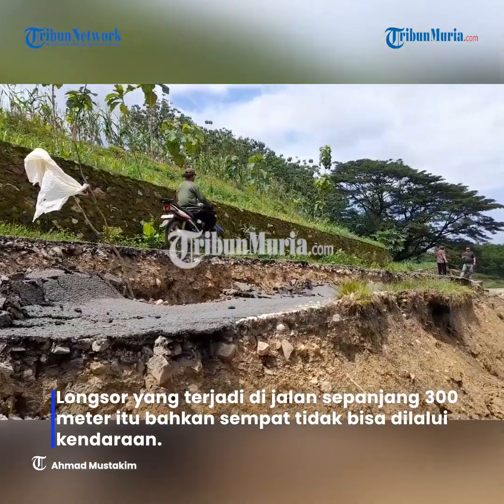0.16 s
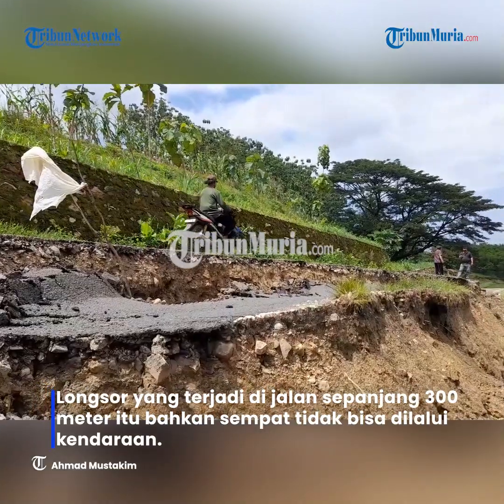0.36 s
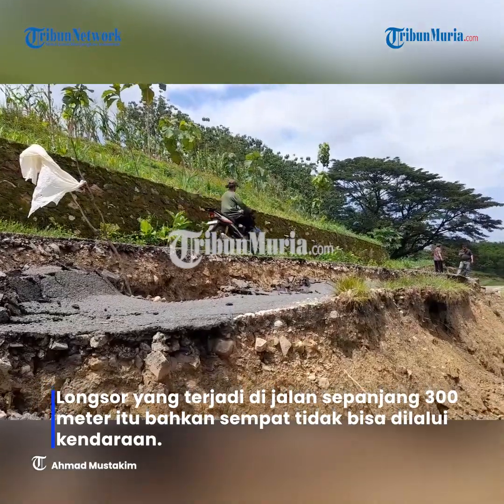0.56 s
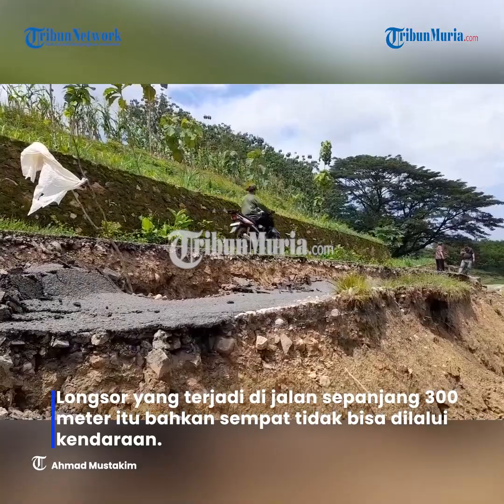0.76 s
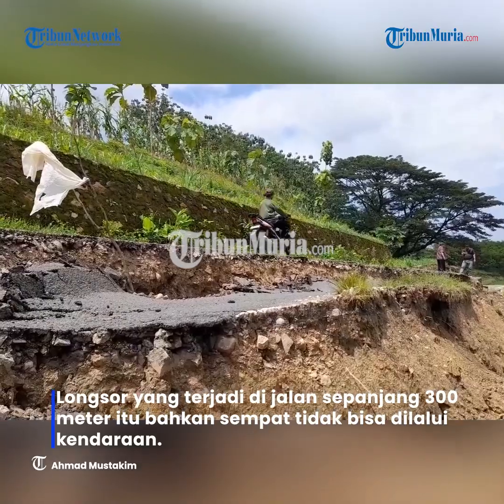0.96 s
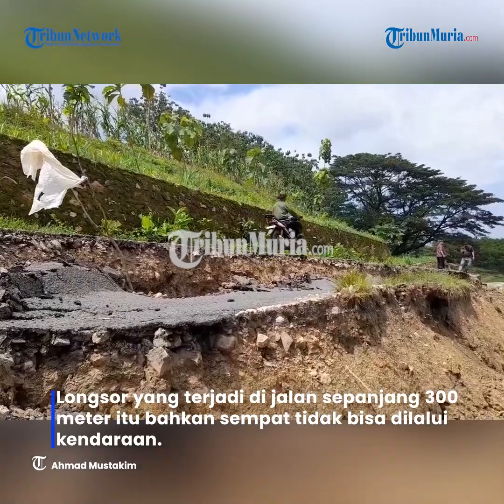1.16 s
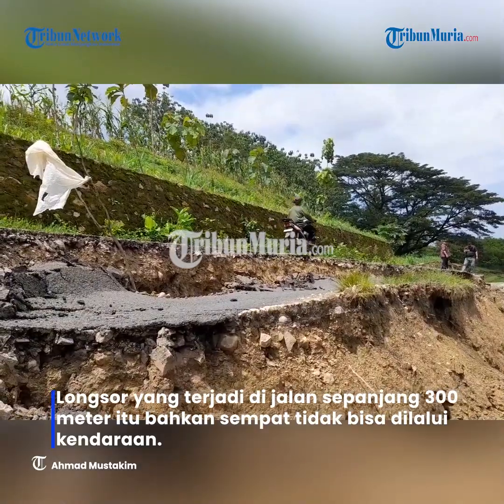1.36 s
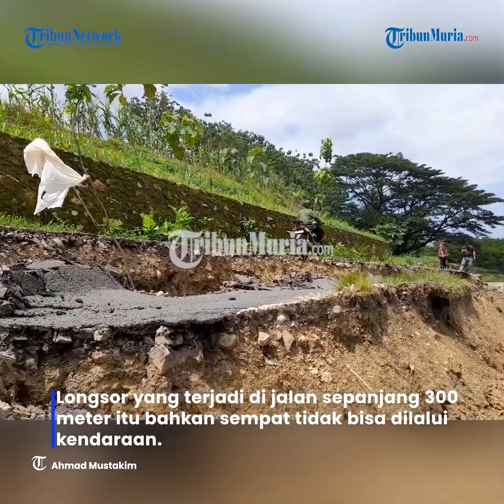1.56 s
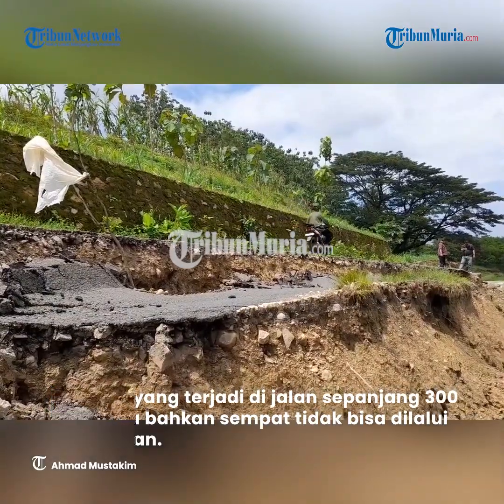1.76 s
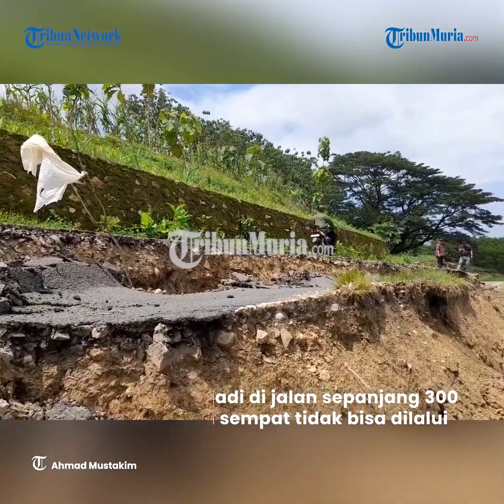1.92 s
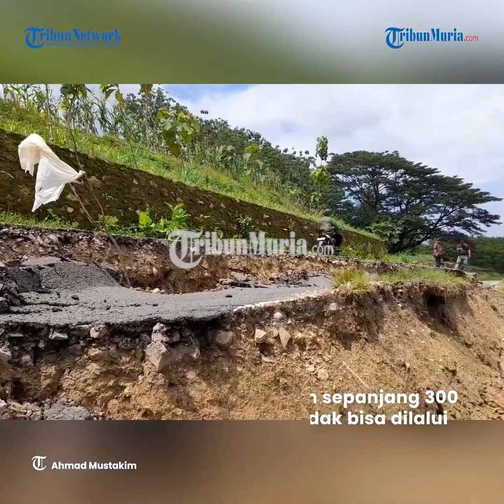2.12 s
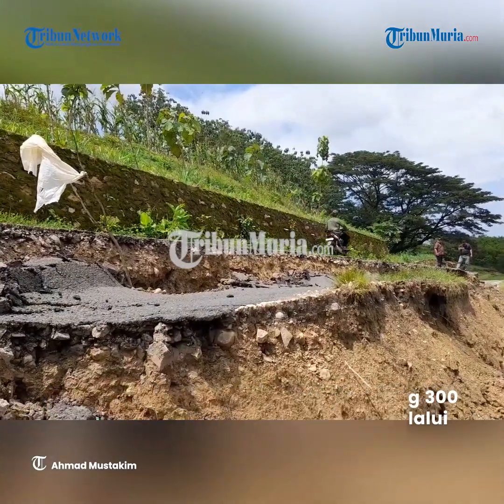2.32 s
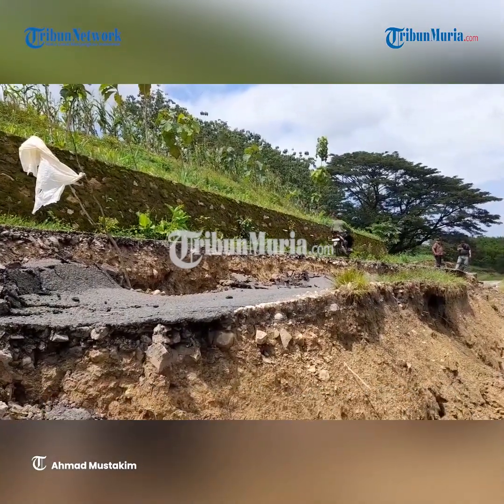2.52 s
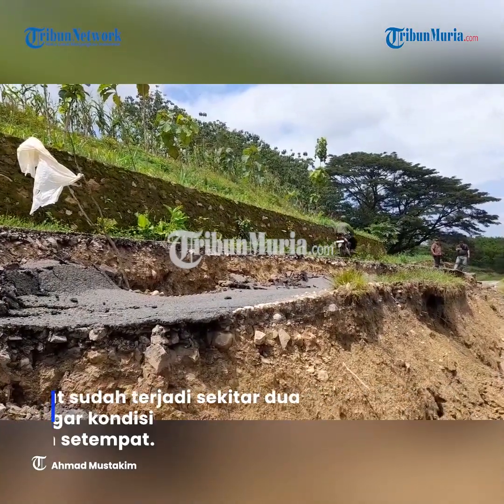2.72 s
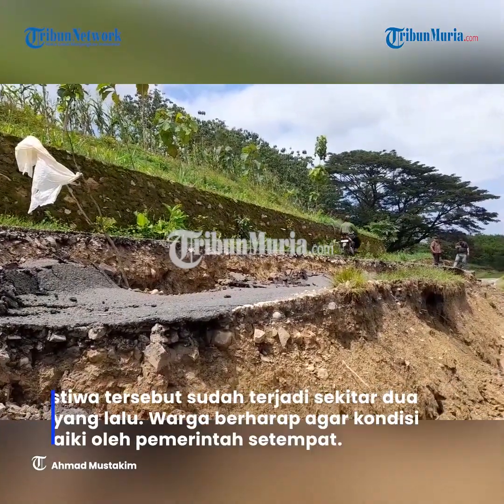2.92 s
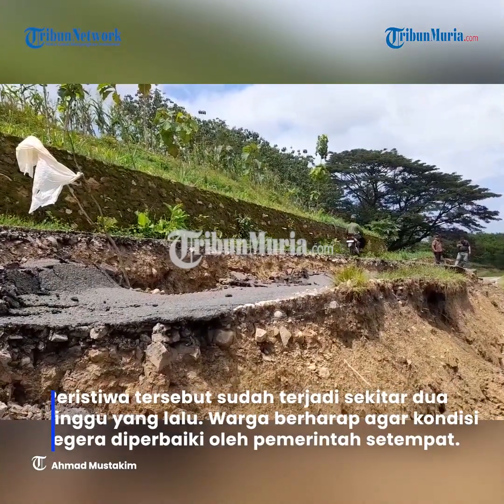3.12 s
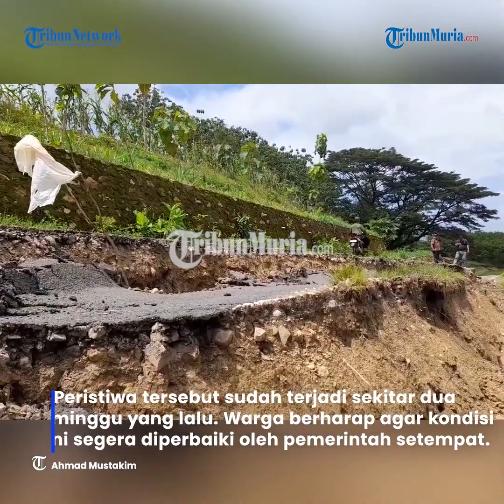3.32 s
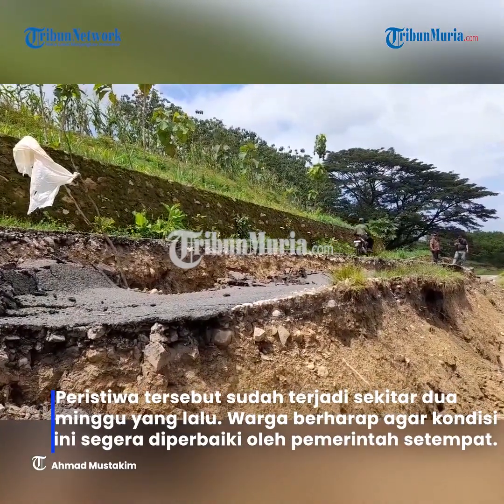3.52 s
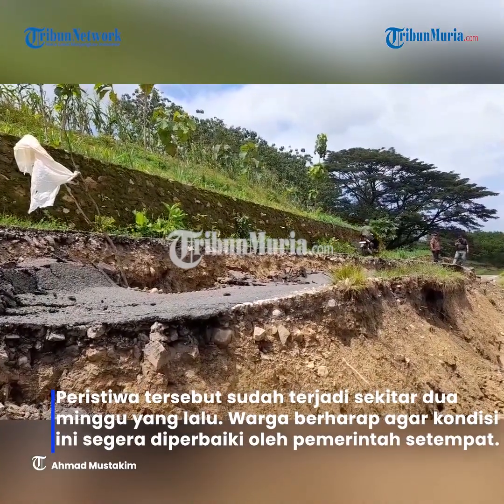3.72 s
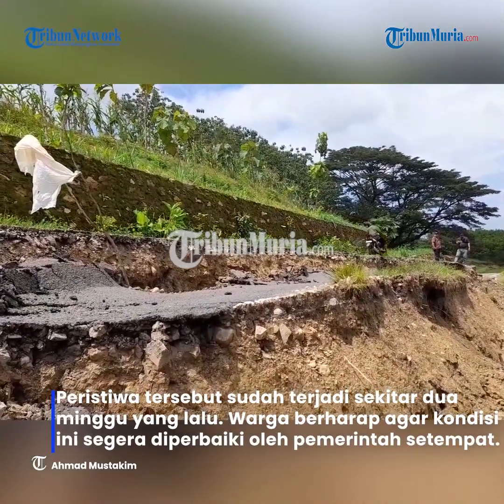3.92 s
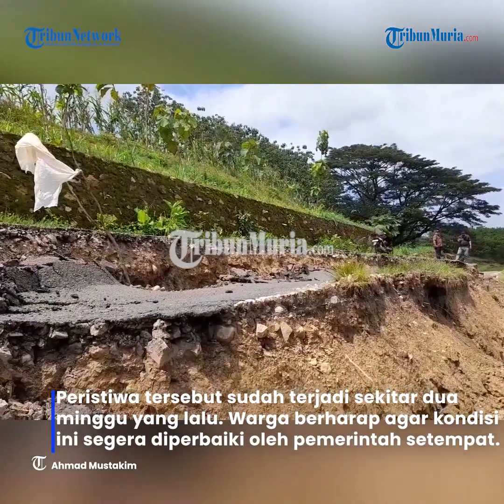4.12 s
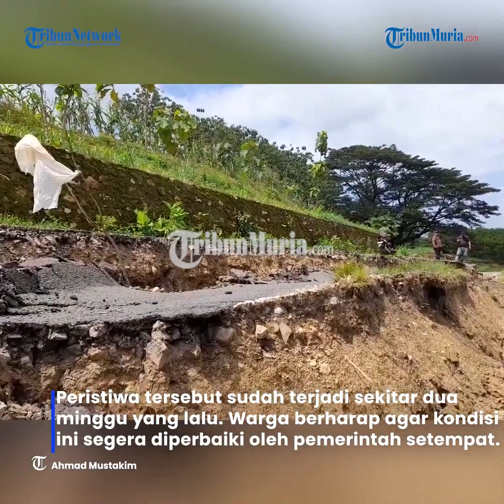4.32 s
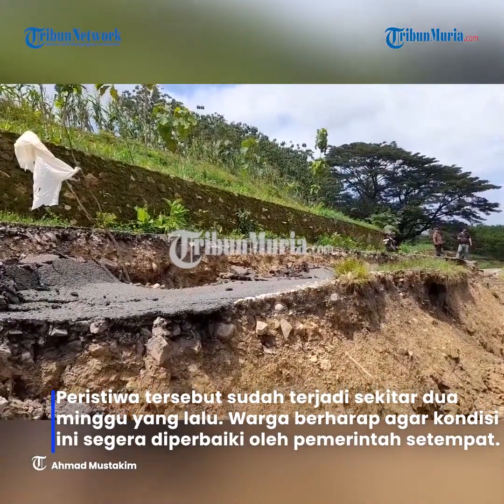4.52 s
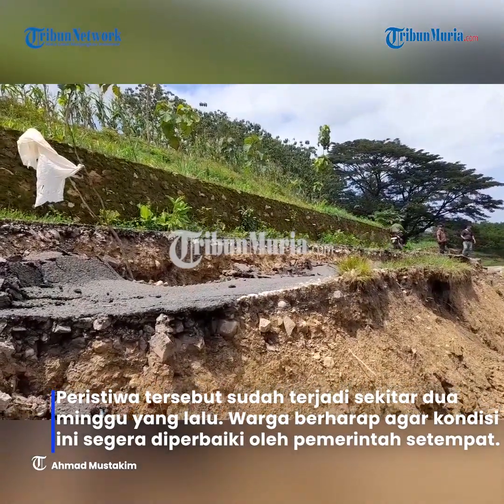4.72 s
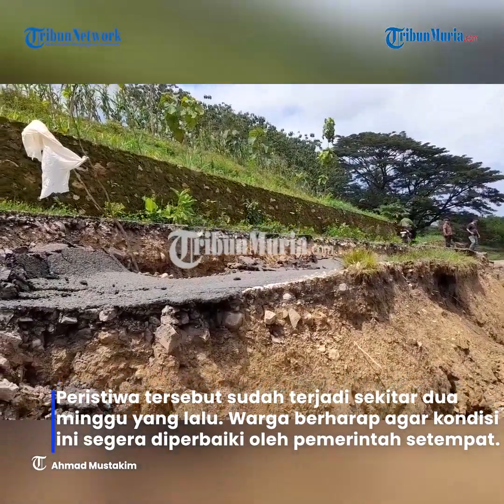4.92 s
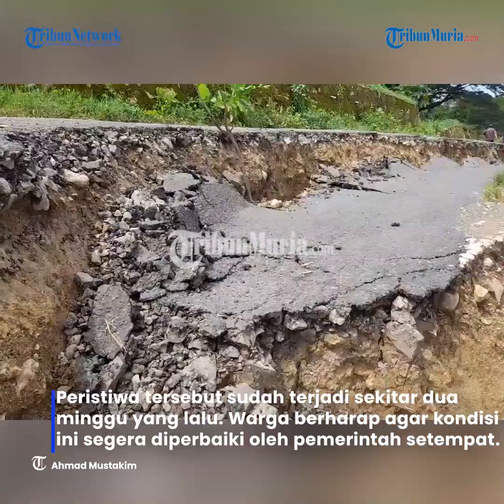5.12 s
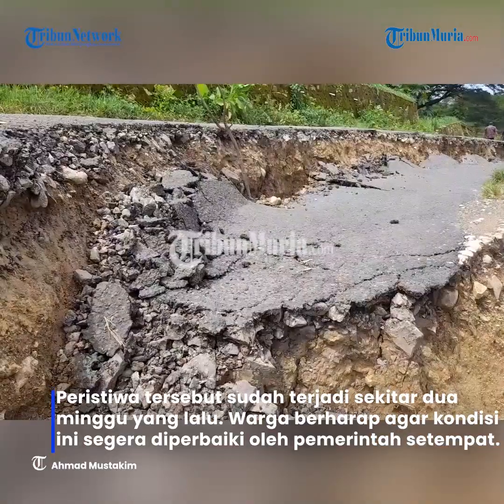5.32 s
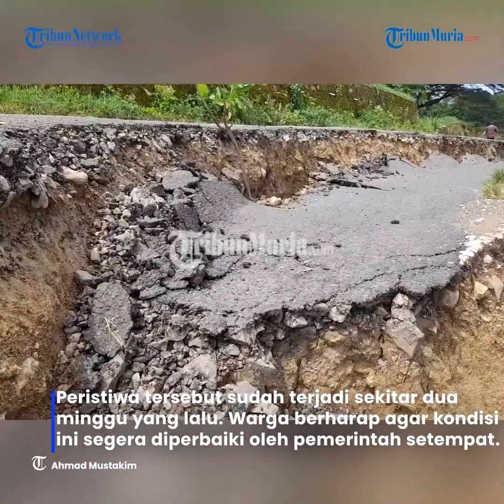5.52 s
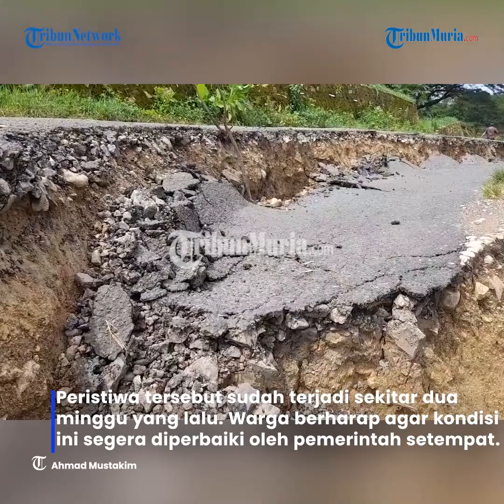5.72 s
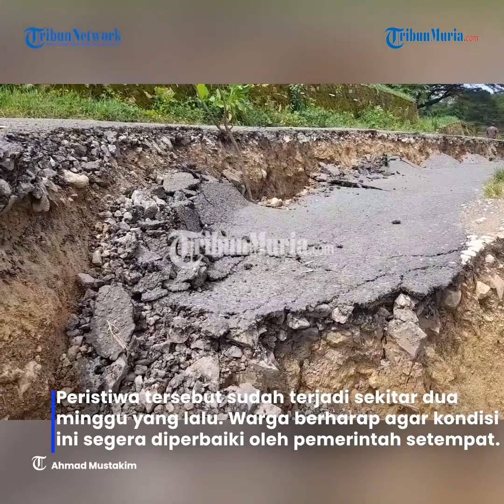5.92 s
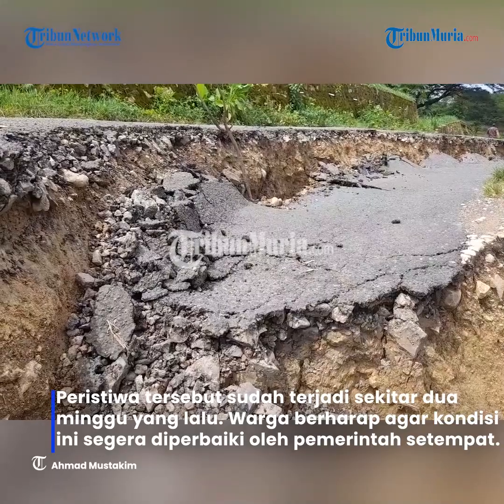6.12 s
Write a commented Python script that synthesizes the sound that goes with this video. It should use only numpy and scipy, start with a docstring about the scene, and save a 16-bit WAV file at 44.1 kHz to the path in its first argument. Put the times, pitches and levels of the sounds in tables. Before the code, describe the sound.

Stereo microphone on an open country verge, bike slightly right of centre. Deep, slow single-cylinder putting begins near, with gravel crunch, tiny metallic grit ticks and hollow frame knocks. A big rattling jolt comes at one second, duller bumps near two, then the bike recedes. Short high bird chirps surface over faint chugging; after five seconds air and engine are abruptly much quieter.

```python
"""Small motorcycle leaving over a gravelly road

From the verge in open country: a single-cylinder bike idles slowly away, each firing ringing its silencer modes.
Filtered noise makes the tyre rumble, crunch and air; decaying sines make the knocks and ticks of grit.
Birds are gliding sines with echoes. At five seconds the microphone stands farther off: engine and air drop.
"""
import sys
import numpy as np
from scipy import signal
from scipy.fft import rfft, irfft, next_fast_len
from scipy.io import wavfile
from scipy.ndimage import uniform_filter1d

SR = 44100
rng = np.random.default_rng(int(sys.argv[2]) if len(sys.argv) > 2 else 0)


def to_wav(sig):
    """Store sig (one row per channel, or 1-D mono) as 16-bit WAV at the path in sys.argv[1].

    Samples outside -1..1 are clipped; the rate is SR.
    """
    pcm = np.clip(np.atleast_2d(sig), -1, 1) * 32767
    pcm = np.round(pcm).astype(np.int16)
    wavfile.write(sys.argv[1], SR, pcm.T)  # frames by channels


N = 272351  # length (samples)


def amp(db):
    """Gain of a level in dB."""
    return 10 ** (np.asarray(db) / 20)


def unit(x):
    """x at rms 1."""
    return x / np.sqrt(np.mean(x ** 2) + 1e-20)


def along(points, hz):
    """Values at hz between (f/Hz, value) points on a log frequency axis."""
    f, v = np.transpose(points)
    return np.interp(np.log(hz + 1), np.log(f + 1), v)


def curves(rows):
    """One value per sample for each column after the time."""
    s, *cols = np.transpose(rows)
    return [np.interp(np.arange(N) / SR, s, c) for c in cols]


def filtered(x, response):
    """x times a response of frequency."""
    m = next_fast_len(N + SR // 2)
    gain = response(np.fft.rfftfreq(m, 1 / SR))
    return irfft(rfft(x, m) * gain, m)[..., :N]


def place(times, sounds):
    """Each sound laid down at its time."""
    out = np.zeros(N + SR)
    for s, sound in zip(times, sounds):
        out[round(s * SR):][:len(sound)] += sound
    return out[:N]


# Likeness of the noise at the left and right microphone ports: f/Hz, likeness 0-1
ALIKE = [(60, 0.05), (180, 0.68), (550, 0.93), (1650, 0.57), (4970, 0.14), (15000, 0.054)]


def rush(spectrum, patchy_db, grit):
    """Stereo noise of rms 1 in patches of time and pitch; grit makes some samples stand out like stones."""
    white = rng.standard_normal((2, N)) * np.exp(grit * rng.standard_normal(N))
    z = signal.stft(white, nperseg=512)[2]
    field = rng.standard_normal(z.shape[1:])
    field = uniform_filter1d(field, size=6, axis=0)  # across frequency
    field = uniform_filter1d(field, size=4, axis=1)  # across time
    pair = signal.istft(z * amp(patchy_db * unit(field)), nperseg=512)[1][:, :N]

    def mid_side_gain(hz):
        angle = np.arccos(np.clip(along(ALIKE, hz), 0, 1)) / 2
        return amp(along(spectrum, hz)) * [np.cos(angle), np.sin(angle)]

    mid, side = filtered(pair, mid_side_gain)
    return unit(np.array([mid + side, mid - side]))


# Spectrum of the open country: f/Hz, relative level/dB per Hz
AIR = [(25, -19), (60, 2.5), (120, 1.5), (180, -9.5), (310, -13), (430, -34.5), (675, -20.5), (1310, -57.5),
       (1940, -32.5), (2630, -70), (3980, -32.5), (5920, -44), (9000, -40), (15500, -46.5)]
# Its loudness, lower once the microphone is farther off: t/s, level/dB
AIR_DB = [(0, -45), (5.0, -45.5), (5.03, -53.5), (6.18, -56.5)]


def open_air():
    """Open country around the microphone: faintly patchy broadband noise."""
    return amp(curves(AIR_DB)[0]) * rush(AIR, patchy_db=1.6, grit=0.34)


# Bumps in the road: t/s of full strength, rise time/s per 20 dB, hold/s,
# then rumble level/dB, crunch level/dB, shaken panel level/dB
BUMPS = [(1.064, 0.05, 0.088, -43.5, -45, -44), (1.51, 0.091, 0.014, -49, -60, -81),
         (1.69, 0.15, 0.043, -38, -53, -72), (1.73, .015, 0.047, -47, -50.5, -54),
         (2.01, .02, .04, -37.5, -48, -69), (2.073, 0.035, 0.01, -38.5, -44.5, -56.5),
         (2.17, 0.025, 0.014, -48, -52.5, -73), (2.25, 0.029, 0.0064, -63, -53, -70),
         (2.454, 0.027, 0.0049, -62, -55, -65)]
# Rate at which rumble, crunch and panel die after a bump [dB/s]
SETTLE_DB_PER_S = [148, 160, 153]


def jolts():
    """Gain of rumble, crunch and panel over the bumps: a rise in dB, a hold, a steady settling."""
    t = np.arange(N) / SR
    settle = np.array(SETTLE_DB_PER_S)[:, None]
    power = 0
    for s, rise, hold, *db in BUMPS:
        before = 20 * np.maximum(s - t, 0) / rise
        after = settle * np.maximum(t - s - hold, 0)
        power = power + amp(np.array(db)[:, None] - before - after) ** 2
    return np.sqrt(power)


# Tyres on the road between bumps: t/s, rumble level/dB, gravel crunch level/dB
ROLL = [(0, -41.5, -53.5), (.7, -46, -54), (1.3, -49.5, -56), (1.95, -48, -56), (2.4, -49, -61),
        (2.55, -51.5, -62), (3.0, -55, -68), (4.99, -62.5, -68.5), (5.04, -69.5, -67.5),
        (5.81, -70.5, -70.5), (6.18, -75, -66.5)]
# Spectrum of the tyre rumble: f/Hz, relative level/dB per Hz
RUMBLE = [(150, 0), (283, -9), (422, -3), (590, -3.5), (700, -5.5), (800, -11), (930, -7), (1210, -18),
          (1430, -9.5), (1700, -17), (2600, -54)]
# Spectrum of the gravel crunch: f/Hz, relative level/dB per Hz
CRUNCH = [(1200, -9.5), (1950, -4), (2250, -6), (2650, -10.5), (3150, -6.5), (3500, -7.5), (4200, -4.5),
          (5000, -8), (5700, -17), (7500, -23)]
# Spectrum of the shaken panel: f/Hz, relative level/dB per Hz
PANEL = [(1700, -49), (2050, -4), (2170, -5), (2330, -4), (2450, -8), (2700, -47)]
# Spectrum of the chain fizz: f/Hz, relative level/dB per Hz
FIZZ = [(5000, -13), (6500, 4.5), (7700, 5.5), (8800, -0.5), (9800, 2.5), (11200, -3), (13000, 5.5),
        (15500, -5.5)]
FIZZ_DB, FIZZ_BUMP_DB = -3.5, -12.5  # chain fizz against the crunch, rolling and on bumps (dB)


def rolling():
    """Tyres rumble on the rough surface, gravel crunches, the chain fizzes, a panel rattles on the bumps."""
    rumble_db, crunch_db = curves(ROLL)
    thud, scrape, shake = jolts()
    rumble = np.hypot(amp(rumble_db), thud) * rush(RUMBLE, patchy_db=2.5, grit=0.56)
    crunch = np.hypot(amp(crunch_db), scrape) * rush(CRUNCH, patchy_db=2.5, grit=0.71)
    panel = shake * rush(PANEL, patchy_db=1.1, grit=1.1)
    fizz_gain = np.hypot(amp(crunch_db + FIZZ_DB), amp(FIZZ_BUMP_DB) * scrape)
    fizz = fizz_gain * rush(FIZZ, patchy_db=3.5, grit=0.75)
    return rumble + crunch + panel + fizz


# Pace of the idling engine while near: t/s, firing rate/Hz
IDLE = [(0, 11.937), (.29, 11.632), (.68, 11.087), (.84, 11.711), (1.29, 12.041), (2.63, 11.974),
        (2.64, 10.811), (3.26, 11.202), (3.61, 12.193), (4.18, 11.252), (5, 11.292)]
# The bike drawing away: t/s, loss of the bark/dB, shift of the tone from ring to body 0-1
LEAVING = [(0, 1.5, 0), (.3, 0.5, 0.18), (.65, 5, 0.17), (1.15, 6.5, 0), (1.5, 10, 0.06), (1.8, 10.5, 0.23),
           (2.05, 18, 0.2), (2.35, 24, 0), (2.6, 33, 0.07), (2.85, 24, 0.86), (3.5, 24.5, 0.75),
           (4.1, 26, 0.99), (4.4, 24, 0.93), (4.95, 25, 0.76)]
# One value per silencer mode (boom, body, bark, ring, outlet pop) in the next four tables.
# Base level near the microphone: level/dB
NEAR_DB = [-27.5, -21, -6, -14.5, -31]
# Share of the bark's loss that the mode suffers [1]
LOSS_SHARE = [0.12, 0.61, 1, 0.5, 0.51]
# What the full shift of tone adds: level/dB
SHIFT_DB = [-1.2, 12, 2.8, -10.5, -5.1]
# Base level from far off: level/dB
FAR_DB = [-51, -46, -33.5, -52, -60]
# Poor firings, each applied to the firing nearest in time: t/s, level change/dB
WEAK = [(1.555, -1), (2.138, -2.5), (2.471, -5), (2.638, -1), (3.277, -4), (3.867, -6), (5.275, -6),
        (5.468, -17), (5.089, -0.5), (5.66, -3), (5.846, -6.5), (6.036, -6)]
FIRST_S, LAST_S = .018, 4.95  # first firing from near, and the limit for the last (s)
FAR_FIRST_S, FAR_RATE = 5.089, 10.52  # from far off: first firing (s), firings a second
SCATTER_DB = 1.2  # each mode varies from firing to firing


def firings():
    """Time of every firing, from the turning engine's phase, and the dB of each silencer mode."""
    turns = np.cumsum(curves(IDLE)[0]) / SR
    turns -= turns[round(FIRST_S * SR)]
    # a firing falls wherever the count reaches a whole number
    near = np.interp(np.arange(turns[round(LAST_S * SR)]), turns, np.arange(N) / SR)
    far = np.arange(FAR_FIRST_S, N / SR, 1 / FAR_RATE)
    loss_db, shift = np.array(curves(LEAVING))[:, (near * SR).astype(int), None]
    near_db = NEAR_DB - loss_db * LOSS_SHARE + shift * SHIFT_DB
    db = np.vstack([near_db, np.tile(FAR_DB, (len(far), 1))])
    s = np.r_[near, far]
    for at, drop_db in WEAK:
        db[np.argmin(abs(s - at))] += drop_db
    return s, db + SCATTER_DB * rng.standard_normal(db.shape)


# Silencer modes boom, body, bark, ring, outlet pop: f/Hz, drive/s while the valve is open,
# t60/s once it shuts, lag/s of the wave through the chambers
SILENCER = [(64.5, .04, .1, .0008), (106.7, .025, .05, .0075), (119.5, .017, .07, .0038),
            (136.7, .03, .16, .0004), (300, .007, .04, .0005)]


def exhaust(s, db, swell=.011):
    """Each firing drives the silencer's modes: they swell, hold while the valve is open, then die."""
    t = np.arange(SR // 5) / SR
    hz, driven, t60, lag = np.transpose(SILENCER)[:, :, None]
    rise = np.sin(np.pi / 2 * np.minimum(t / np.minimum(swell, driven), 1)) ** 2
    envelope = rise * amp(-60 * np.maximum(t - driven, 0) / t60)

    def ring(f):
        return np.sin(2 * np.pi * f * (t - lag)) * envelope

    modes = ring(hz)
    modes[0] += amp(-14 - 60 * t / .3) * ring(3 * hz)[0]  # the boom starts with its third harmonic
    return place(s, amp(db) @ modes)


# Spectrum of the turbulence at the outlet: f/Hz, relative level/dB per Hz
RASP = [(150, -57), (280, 2.5), (400, 0), (570, -9), (720, -30), (880, -2.5), (1000, -3), (1210, -16),
        (1430, -11.5), (1700, -48), (1950, -13), (2600, -38.5)]


def rasp(s, ring_db):
    """Turbulent gas leaves the outlet after each firing, its strength following the ring mode."""
    t = np.arange(SR // 5) / SR
    onset = 1 - np.exp(-t / .003)
    fade = np.cos(np.pi * t / t[-1] / 2)
    puff = amp(-60 * t / .7) * onset * fade
    return place(s, amp(ring_db - 27.5)[:, None] * puff) * rush(RASP, patchy_db=5.5, grit=0.84)


# Loose parts on bumps: t/s, strength as level/dB, f/Hz near which the blow rings most
KNOCKS = [(.084, -28, 960), (0.336, -27, 960), (.689, -29, 920), (0.811, -25.5, 910), (1.032, -28, 1410),
          (1.042, -23.5, 880), (1.061, -20.5, 1220), (1.068, -14.5, 255), (1.067, -15.5, 950),
          (1.492, -37, 600), (1.681, -32, 600), (1.697, -24.5, 565), (1.727, -28, 2200),
          (1.819, -26.5, 604), (2.026, -28, 634), (2.052, -24.5, 600), (2.12, -26.5, 910),
          (2.248, -29, 1160), (2.448, -32, 1180), (3.768, -56, 880)]
# Modes of the frame: f/Hz, relative level/dB, t60/s
FRAME = [(255, 3, .08), (385, -6, .05), (590, 3, .07), (880, -1, .04), (1160, -3, .03), (1430, -4, .03),
         (2200, -6, .03)]
FIRST_CONTACT = 3.4  # the first contact of a jolt against the scuffle after it


def knocks():
    """Every jolt is a short scuffle of contacts; it rings most the frame modes near its own pitch."""
    t = np.arange(SR // 10) / SR
    hz, level, t60 = np.transpose(FRAME)[:, :, None]
    s, db, near_hz = np.transpose(KNOCKS)
    modes = amp(level - 60 * t / t60) * np.sin(2 * np.pi * hz * t)
    octaves_off = np.abs(np.log2(hz.T / near_hz[:, None]))
    scatter_db = 1.53 * rng.standard_normal((len(s), len(FRAME)))
    strength_db = db[:, None] - 8.5 - 13 * octaves_off + scatter_db
    scuffle = rng.standard_normal((len(s), SR // 50)) * amp(-60 * t[:SR // 50] / 0.012)
    scuffle[:, 0] = FIRST_CONTACT
    scuffle /= np.linalg.norm(scuffle, axis=1)[:, None]  # equal energy in every scuffle
    return place(s, signal.fftconvolve(amp(strength_db) @ modes, scuffle, axes=1))


# Grit flicked up: t/s, level/dB, f/Hz
TICKS = [(0.2294, -62, 7580), (0.2892, -49, 7540), (0.408, -44, 8300), (0.4683, -55, 10500),
         (0.4967, -45, 12900), (0.559, -42, 13000), (0.5836, -62, 12900), (1.9739, -51, 9100),
         (1.999, -37, 6460), (2.4182, -42, 9440), (2.4513, -50, 12300), (6.0687, -58, 7700)]


def ticks():
    """Grit clicks against metal: a rapidly dying sine each, 60 dB down in 24 ms."""
    t = np.arange(SR // 100) / SR
    clicks = [amp(db - 60 * t / 0.024) * np.sin(2 * np.pi * hz * t) for _, db, hz in TICKS]
    return place([row[0] for row in TICKS], clicks)


def whistle(hz, db):
    """A sine on a pitch track, soft at both ends."""
    return amp(db) * signal.windows.tukey(len(hz), alpha=.3) * np.sin(2 * np.pi * np.cumsum(hz) / SR)


# Gliding whistles: t/s, length/s, from f/Hz, to f/Hz, glide time/s, level/dB
WHISTLES = [(1.81, .14, 5450, 6150, .06, -54), (4.5, .16, 4800, 5150, .1, -59),
            (4.58, .07, 2750, 4700, .07, -63), (4.66, .16, 5460, 6000, .07, -60),
            (5.01, .19, 3650, 4200, .19, -68), (6.11, .09, 5300, 5100, .09, -67)]
# Chirps that dip and rise again: t/s of the lowest point, heard before/s, heard after/s,
# lowest f/Hz, top f/Hz, level/dB at the lowest point
CHIRPS = [(3.082, 0.00094, .014, 4150, 6100, -55), (3.13, 0.027, 0.019, 4090, 6050, -50.5),
          (3.18, .021, 0.013, 4200, 6200, -50), (3.229, 0.033, 0.0087, 4420, 6200, -53),
          (3.97, 0.00093, .011, 4070, 5600, -57), (4.023, 0.021, .011, 3840, 5930, -52.5),
          (4.074, 0.021, 0.012, 4090, 6000, -51.5)]
FALL_S, CLIMB_S = .021, 0.0137  # a chirp's time from the top down, and back up to it
TOP_GAIN_DB = 0.5  # how much stronger a chirp is at its top
WARBLE_HZ = 75  # random wander of a whistle's pitch


def birds():
    """Gliding whistles and dipping chirps, blurred by the trees' echoes."""
    calls = []
    for s, before, after, low_hz, top_hz, db in CHIRPS:
        t = np.arange(-before, after, 1 / SR)
        height = np.where(t < 0, t / FALL_S, t / CLIMB_S) ** 2
        pitch = low_hz + (top_hz - low_hz) * height
        calls.append((s - before, whistle(pitch, db + TOP_GAIN_DB * height)))
    for s, length, from_hz, to_hz, glide, db in WHISTLES:
        t = np.arange(0, length, 1 / SR)
        warble = unit(uniform_filter1d(rng.standard_normal(SR // 4), size=500))[:len(t)]
        pitch = from_hz + (to_hz - from_hz) * np.minimum(t / glide, 1) + WARBLE_HZ * warble
        swell = .4 + .6 * t / length
        calls.append((s, swell * whistle(pitch, db)))
    flutter = unit(uniform_filter1d(rng.standard_normal(N), size=300))
    direct = place(*zip(*calls)) * amp(2.5 * flutter)  # the air between makes it waver
    trees = rng.standard_normal((2, SR // 4)) * amp(-60 * np.arange(SR // 4) / SR / 0.26)
    trees /= np.linalg.norm(trees[0])
    echoes = signal.fftconvolve(direct[None], trees, axes=1)[:, :N]
    return direct + amp(-7) * echoes


def scene():
    """The bike is a little to the right; birds and open air surround the microphone."""
    air = open_air()
    s, db = firings()
    bike = rolling() + exhaust(s, db) + rasp(s, db[:, 3]) + knocks() + ticks()
    return air + bike * amp([[-.4], [.4]]) + birds()


TOP_HZ = 15800  # band limit of the microphone


def record(dry):
    """The microphone drops the deepest bass and all above the band limit; its left port hears a little late."""
    late = np.array([[3 / SR], [0]])  # left, right (s)

    def microphone(hz):
        bass_cut = hz ** 2 / np.sqrt(hz ** 4 + 40 ** 4)
        return (hz < TOP_HZ) * bass_cut * np.exp(-2j * np.pi * hz * late)

    return filtered(dry, microphone)


dry = scene()
out = record(dry)
to_wav(out)
```